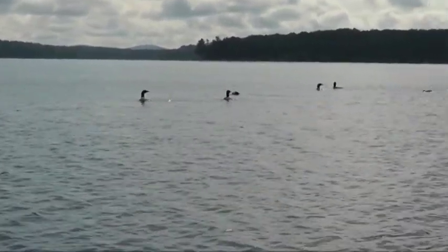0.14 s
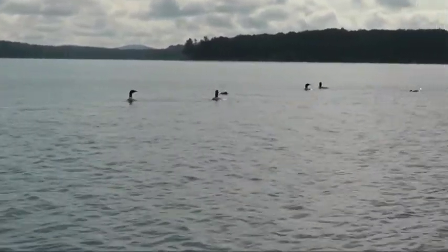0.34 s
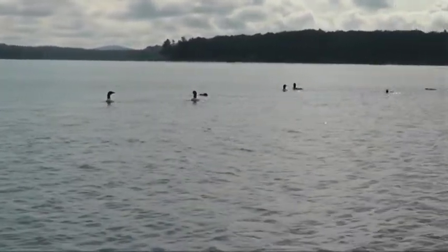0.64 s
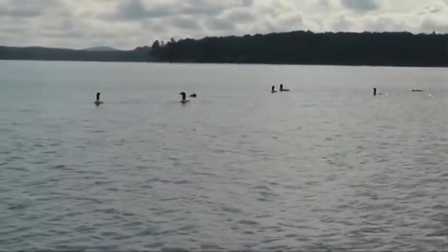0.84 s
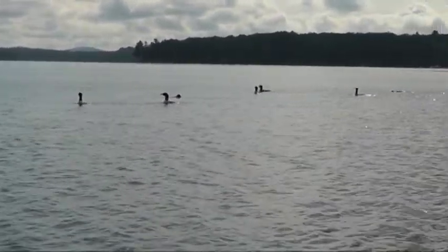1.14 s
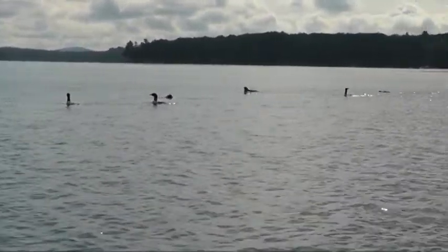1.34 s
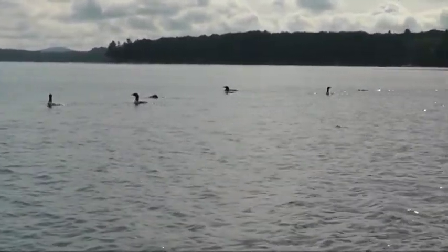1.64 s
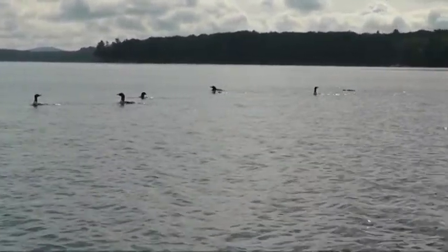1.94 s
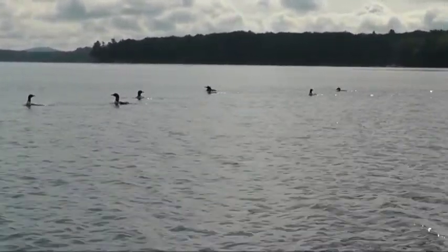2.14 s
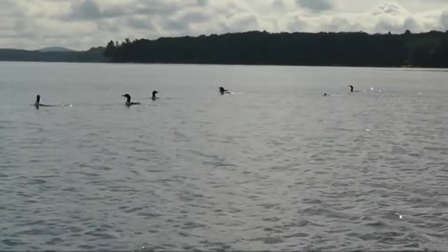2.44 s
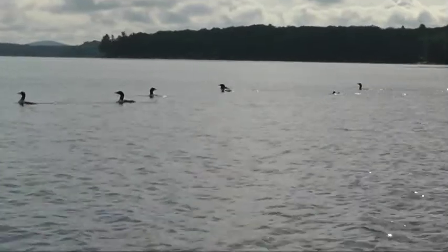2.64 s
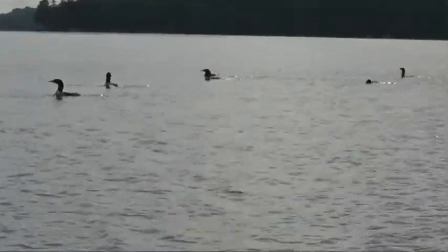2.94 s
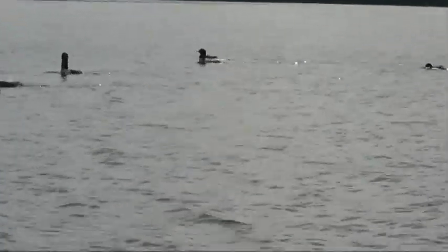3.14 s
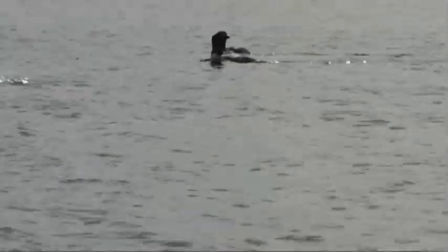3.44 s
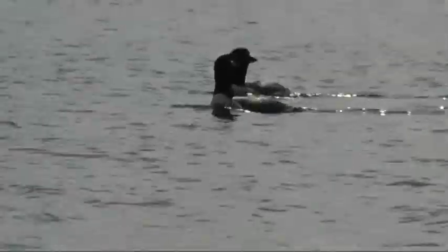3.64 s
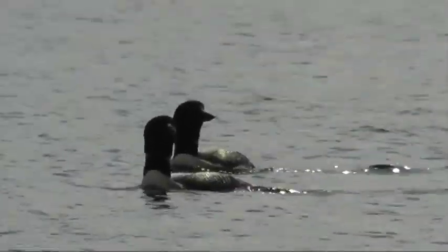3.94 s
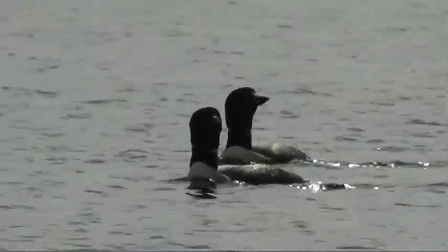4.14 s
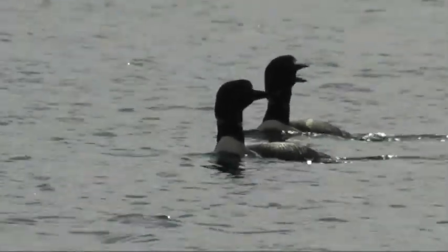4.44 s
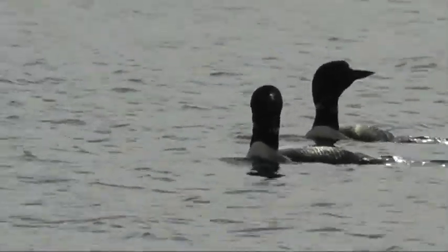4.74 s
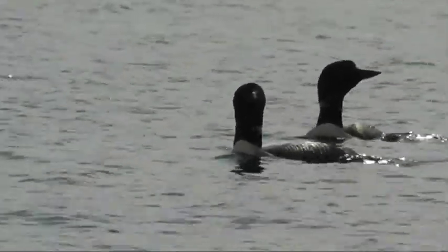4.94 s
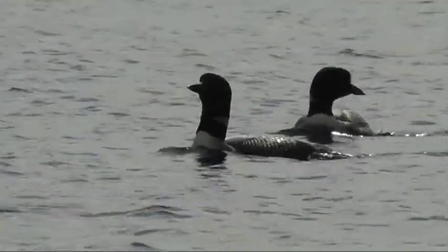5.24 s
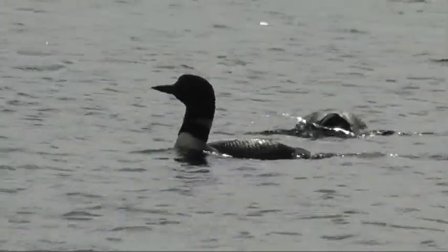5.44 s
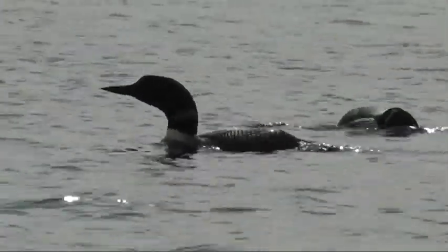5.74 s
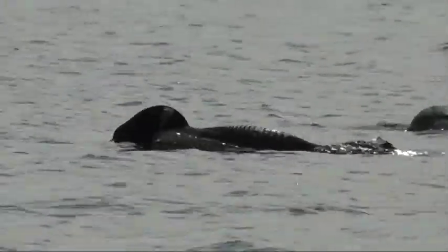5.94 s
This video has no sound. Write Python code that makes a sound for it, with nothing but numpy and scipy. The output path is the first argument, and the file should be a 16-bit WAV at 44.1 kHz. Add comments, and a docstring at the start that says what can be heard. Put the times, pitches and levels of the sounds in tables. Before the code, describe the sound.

A breezy lakeshore in stereo: soft, lumpy wind rumble on the microphone and a faint, smooth hiss of water throughout. At about 0.2 s a loon gives a fairly quiet, trembling laugh, leaning left, until 0.8. A louder one answers from 1.05 to 1.65, jumping from a low hoot to a clear high note throbbing about ten times a second. Its echo fades through a gap; wind swells near 2.1, two very faint far bird whistles bend around 2.5 and 2.7, and a sharp tick clicks close by at 2.6. From 2.9 the laughs crowd together: one flips rapidly between registers, a lower wavering one overlaps from 3.3 to 3.9, a fainter one at left follows, then a strong high one from 4.2 to 4.85. The last laugh runs 4.75 to 5.3, dropping off at its end. Echo, light wind and hiss remain, with faint ticks near 5.7 and 6.0.

```python
"""An open lake, heard from a breezy shore: loons give seven quavering laughs, some overlapping.
Each laugh is a near-pure tone that throbs ten to twelve times a second and jumps between a low and a
high register; its overtones are sine waves, and smeared noise tails send it back off water and shores.
Small ticks ring nearby and two faint whistles arch far off. Filtered noise makes the wind that rumbles
in two microphone ports and the hiss of the lake."""
import sys
import numpy as np
from scipy import signal
from scipy.io import wavfile
from scipy.ndimage import uniform_filter1d

SR = 44100
rng = np.random.default_rng(int(sys.argv[2]) if len(sys.argv) > 2 else 0)


def output_pcm(signal):
    """Save a mono or channel-first signal as 16-bit PCM at the path in sys.argv[1].

    Samples are clipped to [-1, 1] before scaling.
    """
    pcm = np.clip(np.atleast_2d(signal).T, -1, 1) * 32767
    wavfile.write(sys.argv[1], SR, np.round(pcm).astype(np.int16))


N = 269010  # samples in the whole scene

# The laughs, one list each, one row a note sung in one register: (start t/s, end t/s, dip f/Hz,
# dip level/dB, crests [(t/s, f/Hz, level/dB, second and third harmonic level/dB against the fundamental)])
LAUGH_NOTES = [
    [(.222, .285, 601, -38, [(.272, 775, -33, 0.5, -34)]),
     (.288, .62, 881.5, -36, [(.26, 1133, -42, -21.5, -45), (.36, 1161, -27.5, -31, -28),
     (.457, 1176, -27, -28.5, -29), (.557, 1177, -26, -31, -31)]),
     (.62, .648, 651, -33, [(.677, 920, -33.5, -5, -52)]),
     (.648, .71, 864, -36.5, [(.66, 1130, -26, -28, -35)])],
    [(1.075, 1.13, 636, -38.5, [(1.097, 749, -24, -2.5, -26.5)]),
     (1.13, 1.595, 879, -25.5, [(1.195, 1148, -16.5, -23.5, -34.5), (1.297, 1159, -15, -26.5, -36.5),
     (1.4, 1149, -15.5, -29, -39.5), (1.508, 1127, -17.5, -31, -24.5)])],
    [(2.943, 3.14, 698.5, -26, [(2.94, 744, -26.5, -2.5, -29), (3.04, 820, -23, -3, -26.5),
     (3.135, 925, -23, -13, -17.5)]), (3.135, 3.18, 857, -28, [(3.144, 1137, -20.5, -22, -25.5)]),
     (3.18, 3.225, 707, -26.5, [(3.237, 932, -26, -12.5, -16.5)]),
     (3.225, 3.285, 863, -28, [(3.232, 1151, -16.5, -22.5, -24.5)]),
     (3.285, 3.335, 668.5, -25, [(3.342, 919, -24, -11.5, -20)]),
     (3.335, 3.38, 779, -28, [(3.345, 1074, -24.5, -23, -34.5)]),
     (3.38, 3.51, 616, -31, [(3.457, 710.4, -27.5, -8, -25)])],
    [(3.335, 3.92, 706.5, -27, [(3.353, 781, -26.5, -4.5, -30), (3.44, 833, -23.5, -9.5, -39.5),
     (3.525, 844, -23.5, -12.5, -19.5), (3.61, 844, -23.5, -16, -19), (3.695, 839, -24, -13, -21.5),
     (3.785, 824, -24, -10.5, -27.5), (3.88, 775, -26, -9, -45)])],
    [(3.925, 3.995, 616, -41.5, [(3.947, 704.5, -33.5, 2.5, -19)]),
     (4.0, 4.04, 634.5, -30.5, [(4.047, 814, -34, 3, -41.5)]),
     (4.04, 4.2, 870, -33.5, [(4.045, 1110, -26.5, -20, -26.5), (4.143, 1138, -27, -21.5, -24)]),
     (4.207, 4.31, 896, -29.5, [(4.243, 1136, -26.5, -21.5, -27.5)]),
     (4.318, 4.39, 890, -30, [(4.35, 1130, -28, -19.5, -20.5)]),
     (4.4, 4.52, 567, -39, [(4.457, 680, -29.5, -5, -15)])],
    [(4.215, 4.335, 675, -31, [(4.283, 776, -25, -6.5, -33.5), (4.35, 853, -20, -16.5, -37.5)]),
     (4.333, 4.344, 900.5, -28.5, [(4.338, 1075, -18.5, -31.5, -36)]),
     (4.345, 4.408, 693, -24.5, [(4.365, 831, -25, -6, -33)]),
     (4.41, 4.76, 888, -29.5, [(4.455, 1211, -15, -39.5, -37), (4.542, 1210, -16, -37.5, -37.5),
     (4.628, 1190, -16, -34.5, -39.5), (4.72, 1121, -20, -35.5, -38.5)])],
    [(4.745, 4.82, 638.5, -37, [(4.79, 772.5, -24.5, -1.8, -39.5)]),
     (4.82, 5.275, 860, -27, [(4.885, 1154, -18, -35.5, -33.5), (4.988, 1152, -17, -41, -36.5),
     (5.09, 1140, -17.5, -40, -37.5), (5.2, 1061, -21.5, -37, -30)])],
]
# Soft slides into and out of a laugh, one list a laugh:
# (start t/s, end t/s, from f/Hz, to f/Hz, from level/dB, to level/dB)
LAUGH_SLIDES = [
    [(.16, .205, 490, 608, -67, -47), (.712, .78, 587, 542, -40, -46)],
    [(1.05, 1.075, 408, 576, -53.5, -46.5), (1.58, 1.65, 614, 580, -30.5, -41.5)],
    [(2.908, 2.94, 393, 611, -47.5, -38)],
    [],
    [],
    [(4.17, 4.215, 366, 488, -53, -50), (4.765, 4.85, 616, 566, -34.5, -44.5)],
    [(5.266, 5.299, 602, 583, -37.5, -46.5)],
]
# The throb, one row a laugh: (time between crests t/s, how far low dips follow the pitch of their crests [ratio])
LAUGH_THROBS = [(.1, .9), (.104, .9), (.094, 0.27), (.086, 1.3), (.098, .9), (.088, 0.67), (.104, .9)]
# Harmonics against the fundamental, one row a laugh, low register then high:
# (crest higher level/dB, dip second level/dB, dip third level/dB, dip higher level/dB)
REGISTER_TONES = [
    [(-42.5, -7.5, -25, -38), (-33, -33.5, -55.5, -31)],
    [(-28, -22, -42.5, -20.5), (-19.5, -40.5, -29, -17)],
    [(-18.5, -6, -36, -18.5), (-22, -34, -57, -22)],
    [(-18, -23, -43, -18), (-25, -35, -45, -28)],
    [(-27, -11.5, -27, -35), (-27.5, -32, -51, -25)],
    [(-22.5, -6.5, -28.5, -24.5), (-37.5, -36.5, -41, -26.5)],
    [(-19.5, -10.5, -39, -17), (-24, -36, -41, -20.5)],
]
# Colour the throat gives the upper harmonics, one spectrum a laugh: (f/Hz, level/dB)
THROAT_COLOURS = [
    [(1800, -12), (2100, 10), (2500, -9), (3000, -11.5), (3600, 4), (4200, -11), (5000, -3), (6000, -11.5),
     (7100, -20), (8400, -30), (9900, -28), (11800, -27), (14000, -26)],
    [(1800, -12), (2100, -17), (2500, -2), (3000, -10.5), (3600, 0), (4200, -2), (5000, -8), (6000, -7),
     (7100, -21), (8400, -22.5), (9900, -24), (11800, -29), (14000, -36)],
    [(1800, -8), (2100, -0.5), (2500, -23), (3000, -17), (3600, -2.5), (4200, -6), (5000, -18), (6000, -10),
     (7100, -14.5), (8400, -21), (9900, -25), (11800, -34), (14000, -40)],
    [(1800, -2.5), (2100, -20.5), (2500, -5), (3000, -16.5), (3600, 0), (4200, -20.5), (5000, -7),
     (6000, -11.5), (7100, -11.5), (8400, -24), (9900, -30), (11800, -31), (14000, -39)],
    [(1800, 0), (2100, 8), (2500, -18.5), (3000, -6.5), (3600, -8.5), (4200, -11.5), (5000, -14),
     (6000, -13.5), (7100, -16), (8400, -35), (9900, -37), (11800, -31), (14000, -28.5)],
    [(1800, -25), (2100, -8.5), (2500, -16.5), (3000, -15.5), (3600, -4), (4200, -5.5), (5000, -11.5),
     (6000, -6.5), (7100, -9.5), (8400, -19.5), (9900, -16), (11800, -35), (14000, -32.5)],
    [(1800, -14), (2100, -21), (2500, -2), (3000, -22), (3600, -7), (4200, -1.5), (5000, -4.5),
     (6000, -10.5), (7100, -22), (8400, -24.5), (9900, -26), (11800, -33.5), (14000, -34.5)],
]
# Place and voice of the bird, one row a laugh: (left over right level/dB, lead of the left [radians],
# both nearly whole in the bass and shrinking upwards; base level/dB of the lines at thirds of the pitch;
# narrowness of the level's crests against those of the pitch [power])
BIRD_VOICES = [(7, 0.28, -60, 0.67), (3, 0.42, -41, 1.01), (2, 0.39, -27.5, 1.4), (1.1, 0.11, -60., 1.03),
               (8, 0.28, -70.5, 0.74), (1.7, 0.15, -25.5, 1.1), (4, 0.32, -44.5, 0.96)]


def loons():
    """Loons sing: every laugh is a chain of throbbing notes and soft slides from one throat."""
    out = np.zeros((2, N))
    laughs = zip(LAUGH_NOTES, LAUGH_SLIDES, LAUGH_THROBS, REGISTER_TONES, THROAT_COLOURS, BIRD_VOICES)
    for notes, slides, pulse, tones, throat, bird in laughs:
        shapes = [throb(*row, *pulse, tones) for row in notes]
        shapes += [slide(*row) for row in slides]
        for start, end, rows in shapes:
            add(out, *note(start, end, rows, throat, bird))
    return out


HIGH_HZ = 1000  # a note whose highest crest is below this is in the low register
ENTRY_LIFT, ENTRY_DB, ENTRY_DULL_DB = 1.2, -1, -17  # entry before a dip: soft, dull and, if low, sharp
RELEASE_DB_PER_S, RELEASE_DULL_DB = -450, -22  # a note held past its last dip dies away


def throb(start, end, dip_hz, dip_db, crests, throb_s, follow, tones):
    """A throb is crests with dips midway: rows (t/s, f/Hz, fundamental, second, third, higher level/dB)."""
    s, hz, db, second_db, third_db = np.transpose(crests)
    low = hz.max() < HIGH_HZ
    upper_db, *dip_tone = tones[0 if low else 1]

    def beside(c):
        """Mean of the crests on either side of each dip."""
        return (np.r_[c[0], c] + np.r_[c, c[-1]]) / 2

    dips_s = (np.r_[s[0] - throb_s, s] + np.r_[s, s[-1] + throb_s]) / 2
    # high dips rest on one pitch and level; low ones follow their crests
    dips_hz = dip_hz * (beside(hz) / hz.max()) ** (follow * low)
    dips_db = dip_db + low * (beside(db) - db.max())
    rows = [(a, b, c, *(c + np.array(dip_tone))) for a, b, c in zip(dips_s, dips_hz, dips_db)]
    first, last = np.array(rows[0]), np.array(rows[-1])
    rows += zip(s, hz, db, db + second_db, db + third_db, db + upper_db)
    if start < first[0]:
        overtones_db = first[3:] + ENTRY_DB + ENTRY_DULL_DB
        rows.append((start, first[1] * ENTRY_LIFT ** low, first[2] + ENTRY_DB, *overtones_db))
    if end > last[0]:
        fall_db = RELEASE_DB_PER_S * (end - last[0])
        overtones_db = last[3:] + fall_db + RELEASE_DULL_DB
        rows.append((end, last[1] * 1.01, last[2] + fall_db, *overtones_db))
    return start, end, sorted(rows)


# Harmonics of a slide against its fundamental, one row an end, first the start:
# (second level/dB, third level/dB, higher level/dB)
UP_TONES = [(6.5, -2, -23.5), (-4.5, -31.5, -40.5)]
DOWN_TONES = [(-8, -47.5, -36.5), (-13.5, -38, -28)]


def slide(start, end, from_hz, to_hz, from_db, to_db):
    """A slide is one sweep of the voice between two pitches, in rows like those of a throb."""
    from_tone, to_tone = np.array(UP_TONES if to_hz > from_hz else DOWN_TONES)
    first = (start, from_hz, from_db, *(from_db + from_tone))
    last = (end, to_hz, to_db, *(to_db + to_tone))
    return start, end, [first, last]


# Lines between the harmonics when the folds repeat only every third cycle:
# (f in thirds of the pitch [count], level/dB added to the bird's base level)
THIRD_LINES = [(2, 1), (4, -3.5), (5, -9), (7, -22), (8, -28.5)]


def note(start, end, rows, throat, bird, dip_lift_db=1.0, jitter=0.00073, steep_db=0.68, uneven_db=3.0,
         break_hz=875, fade_s=0.0087, rise_s=0.011, throaty=0.39, waver_db=0.72, late_db=-6, late_s=0.011,
         lean_db=0.5, unsteady_db=2.5):
    """The folds sing harmonics on a pitch that arches from dip to crest, and the levels arch with it."""
    s, *columns = np.transpose(rows)
    pan_db, lead, thirds_db, peaked = bird
    t = np.arange(start - fade_s / 2, end + fade_s, 1 / SR)
    since = t - t[0]

    # where we are between two rows
    row = np.clip(np.searchsorted(s, t, "right") - 1, 0, len(s) - 2)
    way = np.clip((t - s[row]) / (s[row + 1] - s[row] + 1e-9), 0, 1)
    rising = columns[0][row + 1] > columns[0][row]
    flat, dwell = 3.1, 1.8  # broad crests, steep flanks, short dips
    arch = 1 - (1 - np.where(rising, way, 1 - way) ** dwell) ** flat

    def along(column, curve):
        """Reads a column along the curve from row to row."""
        return column[row] + np.where(rising, curve, 1 - curve) * (column[row + 1] - column[row])

    first_db, second_db, third_db, upper_db = (along(c, arch ** peaked) for c in columns[1:])
    hz = along(columns[0], arch)
    hz = uniform_filter1d(hz, size=250, mode="nearest")  # the folds cannot turn at once
    high = hz.mean() > 940

    # the low register cracks when pushed too high; the crack rings on into a high note entered near its crest
    entry = (hz[0] > 1050) * np.exp(-since / .012)
    strain = entry if high else 1 / (1 + np.exp((break_hz - hz) / 12))
    hz = hz * (1 + (jitter + 0.034 * strain) * wander(len(t), size=50))
    # a voice with lines at thirds of its pitch is also hoarse
    hz = hz * (1 + 0.16 * high * amp(thirds_db) * wander(len(t), size=40))

    # the third harmonic sweeps through the throat's colour
    third_db = third_db + throaty * (read(throat, 3 * hz) - read(throat, 3 * hz.max()))
    lines = [(1, first_db + waver_db * wander(len(t), size=200))]
    for k, db in [(2, second_db), (3, third_db)]:
        lines.append((k, db + unsteady_db * wander(len(t), size=300)))
    for k in range(4, 21):
        # the top dies first as the voice softens, yet is lifted a little in the dips
        fall_db = steep_db * k * (upper_db - upper_db.max()) - 0.48 * k * strain
        fall_db = fall_db + dip_lift_db * (k - 3) * (1 - arch) ** 2
        # each harmonic drifts on its own, patchier away from the crests and most in the dips
        drift_db = uneven_db * (1 + 0.71 * (1 - arch)) * wander(len(t), size=300)
        lines.append((k, upper_db + read(throat, k * hz) + fall_db + drift_db))
    if high:
        crest_db = first_db - first_db.max()  # thirds are strongest at the crests
        for k, db in THIRD_LINES:
            unsteady = 2.5 * wander(len(t), size=300)
            lines.append((k / 3, thirds_db + first_db + db + crest_db + unsteady))

    # overtones wake late in a soft entry and last longer on the falling flank
    wake_db = late_db * (not entry[0]) * np.exp(-since / late_s)
    lag_db = wake_db + lean_db * np.sin(np.pi * arch) * np.where(rising, -1, 1)
    out = sing(lines, hz, lag_db, strain, pan_db, lead)

    rise_s = fade_s if entry[0] else rise_s  # a crack into a crest is sudden
    fade = np.clip(np.minimum(since / rise_s, (t[-1] - t) / 2 / fade_s), 0, 1)
    return t[0], out * np.sin(np.pi / 2 * fade) ** 2


def sing(lines, hz, lag_db, strain, pan_db, lead, wide_hz=2600, rasp=0.071, breath=0.11):
    """Sums a voice's lines as sine waves; left and right differ in level and phase, mostly in the bass."""
    turns, out = np.cumsum(hz) / SR, np.zeros((2, len(hz)))
    for k, db in lines:
        db = db + lag_db * np.log2(max(k, 1))
        # treble arrives nearly centred
        wide = .5 * (0.16 + 0.82 / (1 + (k * hz / wide_hz) ** 4)) * np.array([[1], [-1]])
        phase = 2 * np.pi * (k * turns + rng.random()) + lead * wide / k ** 2
        # haze around the overtones
        flutter = 1 + (rasp * strain + breath * max(k - 2, 0) ** .5) * wander(len(hz), size=40)
        gain = np.sqrt(2) * amp(db + pan_db * wide) * flutter
        out += gain * (k * hz < SR / 2) * np.sin(phase)
    return out


def shores(x, near_db=-27, near_t60=1.0, far_db=-31, far_t60=0.99, dull_hz=1800):
    """Echoes as dying noise: a smear off the ripples and a dull, faint, delayed tail off wooded shores."""
    t = np.arange(2 * SR) / SR
    near, far = (amp(-60 * t / t60) for t60 in (near_t60, far_t60))
    far = far * (t > .05)  # the far shores answer later
    near = amp(near_db) * near / np.linalg.norm(near) * rng.standard_normal((2, len(t)))
    far = amp(far_db) * far / np.linalg.norm(far) * rng.standard_normal((2, len(t)))
    tail = near + signal.lfilter(*signal.butter(2, dull_hz, fs=SR), far)
    return signal.fftconvolve(x.mean(0)[None], tail, axes=1)[:, :N]


# The ticks: (t/s, ring peak level/dB before its quick rise, thud level/dB against the ring)
TICK_TIMES = [(2.3444, -60, 8), (2.6138, -22, -17), (4.5925, -46, 2), (5.6586, -60, 11), (6.016, -44, -5)]
# Ringing modes of a tick: (f/Hz, shifted a little by chance; level/dB; time to fall by 60 dB t/s)
TICK_RING = [(4900, 6, 0.012), (6250, 4, 0.0098), (7840, -1, 0.015), (11000, -31, .004), (3400, -6, 0.017),
             (2170, -5, 0.007)]


def ticks(thud_hz=1100, thud_t60=0.033):
    """Small hard ticks close by: a few short modes, a crackle of contact and a duller thud."""
    out, t = np.zeros((2, N)), np.arange(1500) / SR
    for s, db, thud_db in TICK_TIMES:
        ring = np.zeros(len(t))
        for hz, mode_db, t60 in TICK_RING:
            tuned_hz = hz * rng.uniform(0.96, 1.02)
            ring += amp(mode_db - 60 * t / t60) * np.sin(2 * np.pi * tuned_hz * t)
        crackle = np.diff(rng.standard_normal(len(t) + 1))
        ring = ring + .5 * amp(-60 * t / 0.0043) * crackle
        thud = amp(thud_db - 60 * t / thud_t60) * np.sin(2 * np.pi * thud_hz * t)
        both = ring / abs(ring).max() + thud * np.array([[1.3], [.7]])  # thud leans left
        add(out, s, amp(db) * np.minimum(t / 0.00043, 1) * both)
    return out


# Two faint whistles of a small far bird, one list each: (t/s, f/Hz, level/dB)
FAR_WHISTLES = [
    [(2.44, 3020, -75), (2.47, 3820, -79), (2.495, 4430, -90), (2.55, 3900, -82)],
    [(2.7, 3220, -72), (2.72, 3630, -77), (2.75, 3180, -66)],
]


def whistles():
    """A small far bird whistles thin pure tones whose pitch bends up and down."""
    out = np.zeros((2, N))
    for rows in FAR_WHISTLES:
        s, hz, db = np.transpose(rows)
        t = np.arange(s[0], s[-1], 1 / SR)
        hz = uniform_filter1d(np.interp(t, s, hz), size=500)
        tone = amp(np.interp(t, s, db)) * np.sin(2 * np.pi * np.cumsum(hz) / SR)
        tone = tone * signal.windows.tukey(len(t), .3)
        add(out, s[0], np.sqrt(2) * tone * np.ones((2, 1)))
    return out


# Strength of the wind: (t/s, rumble common to both ports level/dB, rumble opposite in the ports level/dB)
WIND_GUSTS = [(0.0, -46, -39), (0.15, -37.5, -37.5), (0.45, -49, -34.5), (0.7, -44, -38),
              (0.851, -50.5, -43), (1.0, -45.5, -45), (1.12, -40.5, -32.5), (1.3, -48, -30.5),
              (1.7, -38, -35.5), (1.899, -45.5, -43), (2.1, -32, -31), (2.21, -49, -47),
              (2.3, -39.5, -36.5), (2.8, -39, -37), (2.9, -47, -43.5), (3.05, -40.5, -28),
              (3.3, -46.5, -35.5), (3.8, -47.5, -34), (4.2, -49, -42), (4.3, -49, -34), (4.8, -50, -36),
              (5.1, -59, -44), (5.55, -51, -38), (5.8, -55.5, -39.5), (6.0, -50.5, -38), (6.1, -66, -38)]
# Colour of the rumble common to both ports: (f/Hz, level/dB per Hz, relative)
COMMON_RUMBLE = [(12, -61), (20, -64), (65, 0), (149, 2), (313, -16), (512, -32.5), (586, -45.5),
                 (700, -56.5), (910, -80.5), (1540, -120)]
# Colour of the rumble opposite in the ports: (f/Hz, level/dB per Hz, relative)
OPPOSITE_RUMBLE = [(12, -61), (20, -21), (43, -15), (70, -3.5), (143, -3.5), (248, -11), (330, -17.5),
                   (600, -34), (780, -58.5), (1320, -120)]


def wind():
    """Wind is a lumpy rumble: one part pushes both ports together, one pushes them apart."""
    s, common_db, opposite_db = np.transpose(WIND_GUSTS)
    t = np.arange(N) / SR
    _, common = noise(COMMON_RUMBLE, size=1024, patchy_db=3.0, lumpy_db=0.5, lump_s=0.06)
    _, opposite = noise(OPPOSITE_RUMBLE, size=1024, patchy_db=3.0, lumpy_db=2.5, lump_s=.02)
    common = sound_of(common)[0] * amp(np.interp(t, s, common_db))
    opposite = sound_of(opposite)[0] * amp(np.interp(t, s, opposite_db))
    return np.array([common + opposite, common - opposite])


# Colour of the lake's hiss: (f/Hz, level/dB per Hz, relative)
LAKE_COLOUR = [(180, -41), (300, 1.5), (425, -9.5), (842, -7.5), (994, -14), (1150, -7.5), (1250, -15.5),
               (1660, -20.5), (1780, -22), (2790, -20), (3080, -27.5), (6960, -26.5), (15000, -29),
               (16000, -37)]
# How alike the hiss is in both ports: (f/Hz, left-right likeness [0 to 1])
LAKE_LIKENESS = [(400, 0.084), (1400, 0.39), (3100, 0.72), (4400, 1), (8000, .75), (15000, 0.31)]
LAKE_DB = -57


def lake():
    """Distant ripples and leaves: a smooth noise hiss, more alike in both ports in the treble."""
    hz, z = noise(LAKE_COLOUR, size=512, patchy_db=.6, lumpy_db=0, lump_s=.01)
    same = np.clip(read(LAKE_LIKENESS, hz), -1, 1)[:, None]
    right = same * z[0] + np.sqrt(1 - same ** 2) * z[1]
    return amp(LAKE_DB) * sound_of(np.array([z[0], right]))


def noise(spectrum, size, patchy_db, lumpy_db, lump_s):
    """Spectra of two unrelated noises with shared drifting patches, and lumps shared by all bands."""
    hop = size // 4
    frames, hz = N // hop + 5, np.fft.rfftfreq(size, 1 / SR)
    a, b, c, d, patches = rng.standard_normal((frames, len(hz), 5)).T
    patches = uniform_filter1d(patches, size=8, axis=0)  # across pitch
    patches = evened(uniform_filter1d(patches, size=10, axis=1))  # across time
    keep = np.exp(-hop / SR / lump_s)
    lumps = evened(signal.lfilter([1], [1, -keep], rng.standard_normal(frames)))
    level_db = read(spectrum, hz)[:, None] + patchy_db * patches + lumpy_db * lumps
    return hz, np.array([a + 1j * b, c + 1j * d]) * amp(level_db)


def sound_of(z):
    """Turns short-time spectra into sound of rms 1."""
    size = 2 * (z.shape[1] - 1)
    return evened(signal.istft(z, nperseg=size, noverlap=size * 3 // 4)[1][..., :N])


def wander(length, size):
    """Slow random drift of rms 1; size is the smoothing in samples."""
    smooth = uniform_filter1d(rng.standard_normal(length), size)
    return evened(uniform_filter1d(smooth, size))


def amp(db):
    """Turns dB into gain."""
    return 10 ** (np.asarray(db) / 20)


def evened(x):
    """Scales to rms 1."""
    return x / np.sqrt(np.mean(x ** 2) + 1e-20)


def read(points, hz):
    """Reads a spectrum on a log-frequency axis."""
    f, value = np.transpose(points)
    return np.interp(np.log(hz + 1), np.log(f + 1), value)


def add(mix, s, sound):
    """Mixes a sound in at second s."""
    part = mix[:, round(s * SR):][:, :sound.shape[1]]
    part += sound[:, :part.shape[1]]


def scene():
    """Birds, shores, ticks, whistles, wind and water add up at the two ports."""
    birds = loons()
    return birds + shores(birds) + ticks() + whistles() + wind() + lake()


EDGE_HZ = 15750  # top of the recorded band


def record(dry, deepest_db=28, knee_db=-42, soft_db=4, split_hz=520, cut_hz=45):
    """A wind suppressor narrows the bass in quiet and lets go when it is loud; then the band is limited."""
    mid, side = (dry[0] + dry[1]) / 2, (dry[0] - dry[1]) / 2
    level_db = 10 * np.log10(abs(uniform_filter1d(mid ** 2, size=1500)) + 1e-12)
    shut = 1 / (1 + 2 * np.exp((level_db - knee_db) / soft_db))  # 1 in quiet, 0 when loud
    bass = signal.sosfiltfilt(signal.butter(3, split_hz, fs=SR, output="sos"), side)
    side = side + bass * (amp(-deepest_db * shut) - 1)
    # small capsules lose the deepest bass
    mid, side = signal.sosfilt(signal.butter(2, cut_hz, "high", fs=SR, output="sos"), [mid, side])
    edge = signal.firwin(511, EDGE_HZ, window=("kaiser", 9), fs=SR)
    return signal.oaconvolve(np.array([mid + side, mid - side]), edge[None], "same")


dry = scene()
out = record(dry)
output_pcm(out)
```